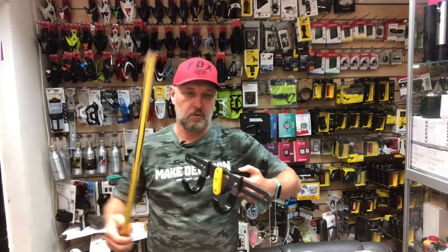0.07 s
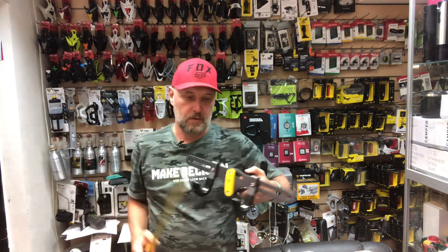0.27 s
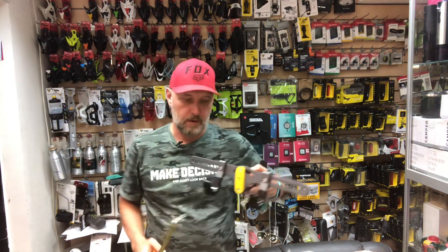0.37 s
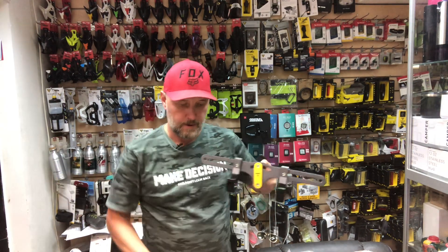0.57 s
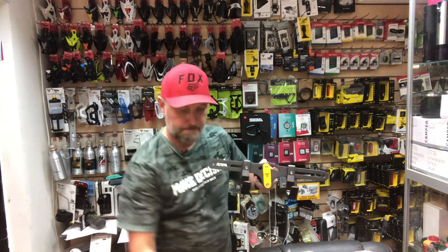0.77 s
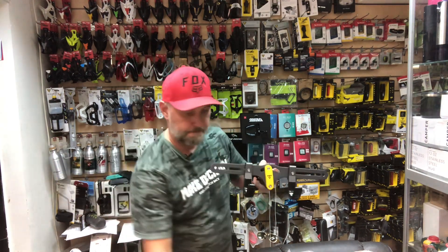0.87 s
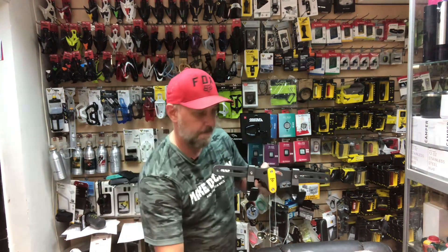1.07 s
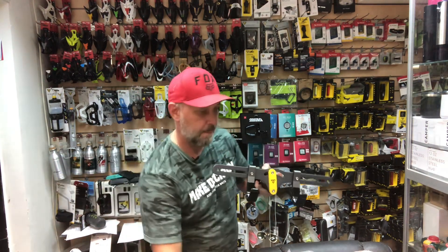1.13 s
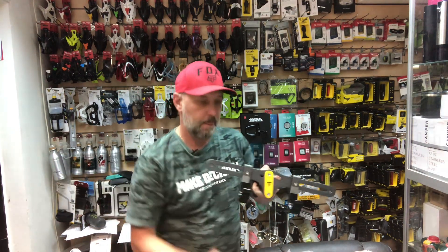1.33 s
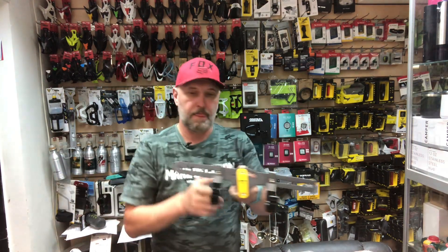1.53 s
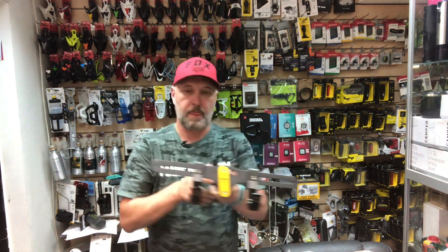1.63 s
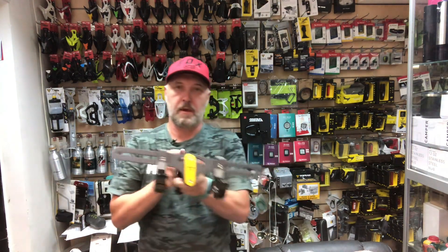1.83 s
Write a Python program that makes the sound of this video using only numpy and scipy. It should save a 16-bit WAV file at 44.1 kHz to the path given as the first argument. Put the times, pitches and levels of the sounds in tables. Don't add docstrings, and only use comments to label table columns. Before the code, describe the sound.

A steel tape measure reels in from 0 to 0.48 seconds, its scraping, slapping blade growing louder, then the hook snaps sharply and bounces with a short rattle. A sleeve rustles and the spring squeaks faintly near 0.7. The plastic case knocks on a wooden counter at 0.9 and again around 1.13-1.2. Light metallic ticks and rubs follow from 1.47, with body rumble on a shirt microphone in a quiet shop.

```python
import sys
import numpy as np
from scipy import signal
from scipy.fft import rfft, irfft
from scipy.io import wavfile

SR = 44100
rng = np.random.default_rng(int(sys.argv[2]) if len(sys.argv) > 2 else 0)


def how_loud(loudness_db):
    steps = np.asarray(loudness_db, float) / 20
    return 10 ** steps


def output_pcm(signal):
    pcm = np.clip(np.atleast_2d(signal).T, -1, 1) * 32767
    wavfile.write(sys.argv[1], SR, np.round(pcm).astype(np.int16))


N = 83790

# [t/s, level/dB]
SWAY = [
    (0, -27.5),
    (.23, -33),
    (.3, -50.5),
    (.58, -33),
    (.7, -47),
    (1.3, -38),
    (1.45, -48.5),
    (1.64, -30.5),
    (1.9, -45.5),
]
# [start/s, end/s, level/dB]
BUMPS = [
    (0, .02, -29),
    (.09, .14, -45),
    (.55, .62, -42.5),
    (.68, .71, -41),
    (.91, .94, -30.5),
    (1.17, 1.24, -32.5),
]
# [start/s, end/s, level/dB]
SLEEVE = [
    (0, .015, -51),
    (.5, .685, -42),
    (.69, .76, -58.5),
    (1.565, 1.59, -59),
]
# [f/Hz, level/dB]
CLOTH = [(150, -16.5), (570, -4), (1350, -8), (1920, -12.5), (16000, -37.5)]
# [f/Hz, level/dB]
SHOP_TONE = [(29, -30.5), (50, 3), (152, -11), (2320, -29), (6710, -32), (11700, -38), (16000, -37)]
SHOP_DB = -56
ROOM_T60_S, ROOM_DB = 0.35, -21.5

# [t/s, scrape level/dB, dullness/1]
REEL = [
    (0, -59, 0.17),
    (.084, -45.5, 0.53),
    (.11, -39, 0.2),
    (.16, -43.5, 0.54),
    (.28, -36, 0.6),
    (.31, -40.5, 1),
    (.42, -36, 0.96),
    (.475, -41, 1.1),
]
# [f/Hz, level/dB]
SCRAPE = [(250, -9.5), (620, -3.5), (3000, -6.5), (7500, -5.5), (13000, -11.5), (16000, -18)]
# [t/s, peak level/dB, f/Hz]
FLAPS = [(.0315, -34, 5000), (.0355, -36, 8000), (.0875, -29, 7000), (.105, -21, 7800), (.115, -26, 12000),
         (.1466, -21, 4400), (.180, -24, 4300), (.1912, -24, 4300), (.2195, -26, 6000), (.229, -23, 7300),
         (.257, -28, 3700), (.2695, -19, 8300), (.281, -27, 5000), (.326, -30, 8400), (.351, -19, 5500),
         (.3565, -19, 7000), (.3685, -22, 7000), (.3852, -14, 4800), (.397, -17, 6500), (.4145, -23, 6500),
         (.4225, -20, 6500), (.4345, -21, 6500), (.4745, -22, 6800)]
DULL_LOW_DB, DULL_TOP_DB = 13.5, -5.5
GRIT_PER_S, GRIT_SHARE, REEL_PATCHY_DB = 3500, 1, 2.4
FLAP_RATTLE_DB, FLAP_T60_S, FLAP_CYCLES = -16.5, 0.19, 14

# [start/s, end/s, level/dB, f/Hz]
SINGS = [(0.04, 0.064, -51, 7960), (0.074, 0.117, -56, 1760), (.09, 0.135, -42, 13000),
         (0.147, 0.246, -57, 1465), (0.185, 0.203, -48, 717), (0.213, 0.242, -48, 1647),
         (0.223, 0.234, -39, 7470), (0.28, 0.289, -42.5, 1750), (0.33, 0.356, -40.5, 8700),
         (0.346, 0.365, -37, 7200), (0.396, 0.404, -35, 700), (0.396, 0.421, -35.5, 6600),
         (.41, 0.446, -37.5, 2080), (0.415, .445, -38.5, 2510), (0.427, 0.445, -41, 609),
         (0.46, 0.466, -36, 1344), (0.478, 0.49, -34, 6200), (1.117, 1.152, -60, 12400),
         (1.12, 1.15, -67, 10700), (1.122, 1.144, -38.5, 790), (1.128, 1.14, -43, 540),
         (1.123, 1.146, -49, 1790), (1.16, 1.191, -41, 572), (1.162, 1.176, -37, 7400),
         (1.164, 1.227, -46, 2617), (1.488, 1.552, -69, 2620), (1.726, 1.778, -63, 3710)]
SING_T60_S = .03

# [t/s, peak level/dB, f/Hz]
TICKS = [(.095, -37, 700), (.096, -37, 450), (.148, -38, 520), (.235, -39, 450), (.837, -50, 600),
         (.8833, -39, 2690), (.8935, -43, 2500), (1.030, -46, 11000), (1.1134, -40, 8000),
         (1.4712, -39, 2600), (1.4716, -47, 1300), (1.484, -50, 2200), (1.5590, -36, 2470),
         (1.559, -50, 7000), (1.570, -47, 900), (1.580, -49, 1000), (1.6885, -41, 1000),
         (1.6888, -43, 1700), (1.691, -47, 2900), (1.7488, -46, 7500), (1.764, -44, 4850),
         (1.780, -50, 11000), (1.7823, -45, 1450), (1.787, -42, 4300), (1.7875, -42, 1450),
         (1.8315, -42, 1300), (1.8625, -40, 1050), (1.896, -48, 1300)]
TICK_CYCLES = 13
# [start/s, end/s, level/dB, lean to high tones/(dB per octave)]
CLINKS = [
    (1.83, 1.826, -45.5, 0),
    (1.859, 1.89, -40.5, -1.5),
]
# [f/Hz, level/dB]
METAL = [(2020, -8), (2370, -10), (3080, 1), (3700, -6), (3990, -7), (4300, -12), (4770, -5), (6070, -12),
         (7020, -15), (7450, -12), (8320, -16), (10200, -10), (11700, -19)]
METAL_T60_S, GRIND_DB = .035, -1

# [t/s, level/dB]
SNAP = [
    (.4832, -13),
    (.4849, 1),
    (.4876, -2),
    (.4922, -12),
    (.4985, -15),
    (.5125, -20),
]
# [f/Hz, level/dB, t60/s]
CASE = [(545, -9.5, 0.03), (633, -5, 0.093), (888, -2, 0.04), (1354, -9, 0.024), (2504, -7, 0.05),
        (2762, -16, 0.091), (4060, -9.5, 0.033), (4748, -19.5, .06), (5545, -21, 0.042),
        (5850, -1.5, 0.025), (5980, -12.5, 0.034), (6600, -7.5, .05), (7610, -6.5, .045),
        (8450, -16.5, 0.09)]
# [f/Hz, level/dB]
CRACK = [(200, -33), (600, -3), (1140, -11), (2510, -6.5), (3200, -18), (6300, -6), (9500, -17.5),
         (12300, -17.5), (16000, -30.5)]
CRACK_DB, CRACK_T60_S, CASE_DB = -10, .022, -11
TAIL_DB, TAIL_T60_S = -15.5, 0.16

# [start/s, end/s, level/dB]
SETTLE = [
    (.685, .715, -45.5),
    (.715, .745, -57),
]
# [f/Hz, width/Hz, level/dB]
SPRING = [(5850, 490, 8), (3100, 2600, 9.5), (6200, 2500, 5), (11650, 350, -5)]

# [t/s, peak level/dB, dull part level/dB, t60/s]
KNOCKS = [
    (0.9074, -21.5, -35.5, 0.2),
    (0.913, -22.5, -28.5, 0.12),
    (0.927, -27.5, -61, 0.09),
    (1.0129, -31, -65, 0.33),
    (1.128, -24.5, -31.5, 0.11),
    (1.158, -15, -30.5, 0.1),
    (1.1738, -23.5, -28.5, 0.13),
    (1.193, -18.5, -38, 0.11),
]
# [f/Hz, width/Hz, level/dB]
COUNTER = [(55.3, 7.7, -5), (172, 32, 2.5), (231, 9.9, 3.5)]
# [f/Hz, width/Hz, level/dB]
WOOD = [(540, 90, 1), (640, 70, 0), (900, 250, -5), (330, 120, -3)]
# [f/Hz, level/dB]
SHELL = [(1000, -2), (2000, -6.5), (2650, 0), (3400, -5.5), (7500, -5.5), (9900, -20.5), (15500, -20.5)]
# [start/s, end/s, level/dB, f/Hz]
HUMS = [
    (0.91, 0.946, -29, 116.1),
    (0.911, 0.941, -30.5, 165.7),
    (1.001, 1.154, -35.5, 87),
    (1.163, 1.226, -26.5, 127.7),
    (1.168, 1.211, -36, 224),
    (1.254, 1.377, -50, 102.7),
]
HUM_SAG_PER_S = 1.2
BOOM_DB = -10
# [start/s, end/s, level/dB]
DRAGS = [
    (.94, 1.0, -51.5),
    (1.015, 1.06, -50.5),
    (1.06, 1.15, -53.5),
    (1.21, 1.34, -59),
    (1.56, 1.62, -61),
    (1.67, 1.79, -67.5),
]
# [f/Hz, level/dB]
SCUFF = [(250, 5.5), (600, -4), (1500, -5.5), (7700, -7.5), (16000, -35)]
# [start/s, end/s, level/dB]
JUDDER = [
    (1.04, 1.11, -48),
    (1.24, 1.45, -62),
]
# [start/s, end/s, level/dB]
FINGERTIPS = [
    (1.2, 1.35, -59),
]

# [t/s, level/dB]
RAPS = [
    (.9085, -36),
    (.9153, -21.5),
    (.921, -30.5),
    (.9405, -30.5),
]
# [f/Hz, level/dB, t60/s]
BOARD = [(444, -5, 0.0081), (656, -0.5, 0.048), (930, 1, .045), (2137, -8, 0.049)]

# [start/s, end/s, level/dB]
SHIVER = [
    (1.618, 1.657, -52.5),
]
# [f/Hz, level/dB]
CATCH = [(1010, -3), (2360, 0), (3650, -2), (5230, -6), (5460, -7), (6640, -7), (8030, -8), (9690, -4),
         (10000, -8), (10600, -13), (11500, -13), (13000, -5)]


def in_time(rows):
    s, *columns = np.transpose(rows)
    return [np.interp(np.arange(N) / SR, s, column) for column in columns]


def rms_one(x):
    return x / np.sqrt(np.mean(x ** 2) + 1e-20)


def noise():
    return rng.standard_normal(N)


def drift(rate_hz):
    r = np.exp(-2 * np.pi * rate_hz / SR)
    wander = signal.lfilter([1], [1, -2 * r, r * r], rng.standard_normal(N + SR))
    return rms_one(wander[SR:])


def grit(rate_per_s, spread_db):
    hits = rng.random(N) < rate_per_s / SR
    sizes = how_loud(spread_db * np.minimum(rng.exponential(1, N), 5))
    return rms_one(hits * sizes * rng.choice([-1, 1], N))


def click(s, db):
    x = np.zeros(N)
    x[int(s * SR)] = how_loud(db)
    return x


def band(x, low_hz, high_hz):
    return signal.sosfilt(signal.butter(2, [low_hz, high_hz], "band", fs=SR, output="sos"), x)


def colour(x, points):
    hz, db = np.transpose(points)
    f = np.fft.rfftfreq(N, 1 / SR) + 1
    gain_db = np.interp(np.log(f), np.log(hz), db, left=-60, right=-80)
    return rms_one(irfft(rfft(x) * how_loud(gain_db), N))


def ring(clicks, hz, t60):
    r = how_loud(-60 / (max(t60, .001) * SR))
    w = 2 * np.pi * hz / SR
    return signal.lfilter([0, np.sin(w)], [1, -2 * r * np.cos(w), r * r], clicks + 1e-18)


def body(x, peaks):
    out = 0
    for k, (hz, width, db) in enumerate(peaks):
        out = out + (-1) ** k * how_loud(db) * rms_one(ring(x, hz, 2.2 / width))
    return rms_one(out)


def dying(s, db, t60, rise=1 / 3000):
    t = np.maximum(np.arange(N) / SR - s, 0)
    return how_loud(db - 60 * t / max(t60, .002)) * np.minimum(t / rise, 1)


def swells(rows, rise=0.0071, fall=0.015):
    t = np.arange(N) / SR
    return sum(how_loud(db) * np.clip((t - a) / rise, 0, 1) * np.exp(-np.maximum(t - b, 0) / fall)
               for a, b, db, *_ in rows)


def wearer():
    sway = how_loud(in_time(SWAY)[0]) * rms_one(band(band(noise(), 4.55, 14.0), 1.4, 21.1))
    bumps = (swells(BUMPS, 0.0043, 0.01) + how_loud(-63.5)) * rms_one(band(noise(), 22, 53))
    rustle = swells(SLEEVE, 0.0028, 0.0038) * how_loud(drift(60)) * colour(noise(), CLOTH)
    return sway + bumps + rustle


def quiet_shop():
    return how_loud(SHOP_DB + drift(26)) * colour(noise(), SHOP_TONE)


def room_echo(x):
    t = np.arange(SR // 2) / SR
    dull = signal.lfilter([.4], [1, -.6], rng.standard_normal(len(t)))
    tail = dull * how_loud(-60 * t / ROOM_T60_S) * (t > .006)
    return how_loud(ROOM_DB) * signal.fftconvolve(x, tail / np.sqrt(np.sum(tail ** 2)))[:N]


def tape():
    db, dullness = in_time(REEL)
    t = np.arange(N) / SR
    edges = np.geomspace(150, 18000, num=9)
    layers = 0
    for low, high in zip(edges, edges[1:]):
        lean_db = np.interp(np.log(low), np.log([1500, 4000, 10000]), [DULL_LOW_DB, 0, DULL_TOP_DB])
        scrape = colour(GRIT_SHARE * grit(GRIT_PER_S, 2.7) + .5 * noise(), SCRAPE)
        patchy = how_loud(lean_db * (dullness - 1.0) + REEL_PATCHY_DB * drift(45))
        layers = layers + patchy * band(scrape, low, high)
    rattle, pings = 0, 0
    for s, peak, hz in FLAPS:
        rattle = rattle + dying(s, peak + FLAP_RATTLE_DB, FLAP_T60_S) ** 2
        slap = click(s, peak + 3) + dying(s, peak - 24, .05) * noise()
        pings = pings + band(ring(slap, hz, FLAP_CYCLES / hz), .55 * hz, 17000)
    running = (t > REEL[0][0]) & (t < SNAP[0][0])
    return np.sqrt(running * how_loud(db) ** 2 + rattle) * layers + pings


def singing():
    rub = grit(2500, 2.1) + .5 * noise()
    out = 0
    for a, b, db, hz in SINGS:
        tone = rms_one(ring(rub, hz, SING_T60_S * min(2500 / hz, 1.6)))
        out = out + tone * swells([(a, b, db)], 0.0034, .004)
    return out


def small_parts():
    white = noise()
    out = 0
    for s, db, hz in TICKS:
        broad_snap = dying(s, db - 11, .025) * rms_one(band(white, .6 * hz, 1.45 * hz))
        out = out + ring(click(s, db), hz, TICK_CYCLES / hz) + broad_snap
    for *stroke, lean_db in CLINKS:
        touch = click(stroke[0], stroke[2] + 14)
        chatter = swells([stroke], 0.0016, 0.0071) * grit(6000, 0.3) + touch
        out = out + how_loud(GRIND_DB) * band(band(chatter, 670, 8200), 560, 9400)
        for hz, db in METAL:
            level_db = db - 25.5 + lean_db * np.log2(hz / 6000)
            out = out + how_loud(level_db) * ring(chatter, hz, METAL_T60_S)
    return out


def snap():
    sides = rng.choice([-1, 1], len(SNAP))
    rings = 0
    for hz, level_db, t60 in CASE:
        blows = sum(side * click(s, db + level_db + CASE_DB + rng.normal())
                    for side, (s, db) in zip(sides, SNAP))
        rings = rings + ring(blows, hz, t60)
    crack = sum(dying(s, db + CRACK_DB, CRACK_T60_S) ** 2 for s, db in SNAP)
    tail = dying(SNAP[0][0], TAIL_DB, TAIL_T60_S) ** 2
    tick = ring(sum(click(s, db - 6) for s, db in SNAP), 5000, .002)
    rough = colour(noise() + .5 * grit(2600, 1.7), CRACK)
    return band(rings, 650, 16000) + tick + np.sqrt(crack + tail) * rough


def spring():
    return swells(SETTLE, 0.0023, 0.02) * body(noise(), SPRING)


def counter():
    t = np.arange(N) / SR
    hum = 0
    for row in HUMS:
        start, end, _, hz = row
        loudness = swells([row], 0.012, 0.0138) * how_loud(drift(22))
        sag = HUM_SAG_PER_S * (t - (start + end) / 2) ** 2 / 2
        hum = hum + loudness * np.sin(2 * np.pi * hz * (t - sag + drift(13) / 1500))
    scuff = swells(DRAGS) * colour(noise(), SCUFF)
    fingertips = swells(FINGERTIPS, 0.01, 0.045) * rms_one(band(noise(), 7900, 13600))
    boom, thud, clatter = 0, 0, 0
    for s, db, dull, t60 in KNOCKS:
        boom = boom + dying(s, dull + BOOM_DB, 2.4 * t60, 0.0017)
        thud = thud + dying(s, dull, 0.53 * t60, 0.0029)
        clatter = clatter + dying(s, db - 16.5, t60)
    knocks = boom * body(noise(), COUNTER)
    knocks = knocks + (thud + swells(JUDDER, 0.02)) * body(noise(), WOOD)
    knocks = knocks + clatter * colour(noise() + 0.96 * grit(2500, 2.8), SHELL)
    return hum + scuff + fingertips + knocks


def raps():
    return sum(ring(sum(click(s, db + level_db - 3.5) for s, db in RAPS), hz, t60)
               for hz, level_db, t60 in BOARD)


def catch():
    chatter = swells(SHIVER, 0.015, 0.004) * grit(9000, 0.9)
    rings = sum(how_loud(db - 22.5) * ring(chatter, hz, 0.032) for hz, db in CATCH)
    return how_loud(4.5) * band(chatter, 830, 5700) + rings


def scene():
    squeak = spring()
    near = tape() + snap() + squeak + counter() + small_parts() + singing() + raps() + catch()
    return (near + room_echo(near) + wearer() + quiet_shop())[None]


def band_limit(x):
    return signal.sosfilt(signal.butter(12, 16330, fs=SR, output="sos"), x)


def record(dry):
    rounded = 1.448 * np.tanh(dry / 1.6)
    mix = signal.sosfilt(signal.cheby2(12, 60, 16300, fs=SR, output="sos"), rounded)
    return band_limit(mix)


dry = scene()
out = record(dry)
output_pcm(out)
```